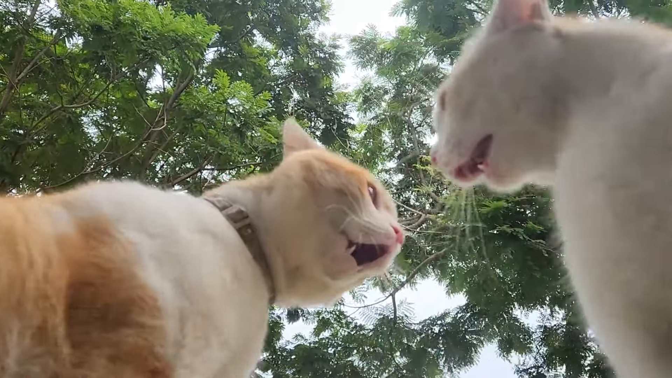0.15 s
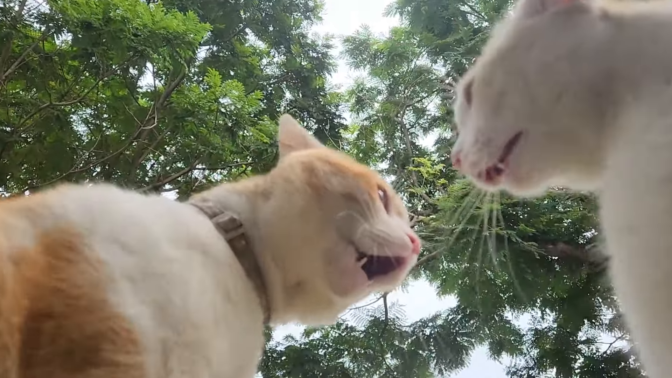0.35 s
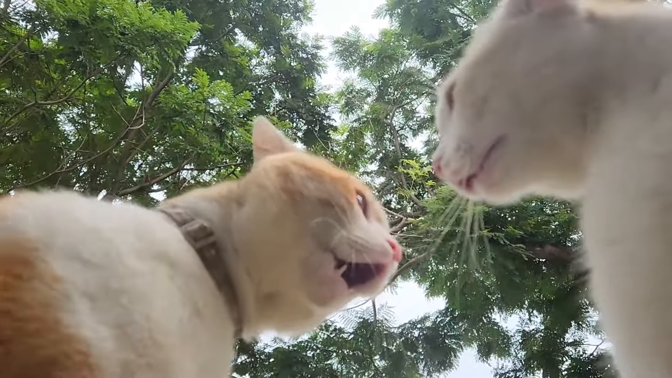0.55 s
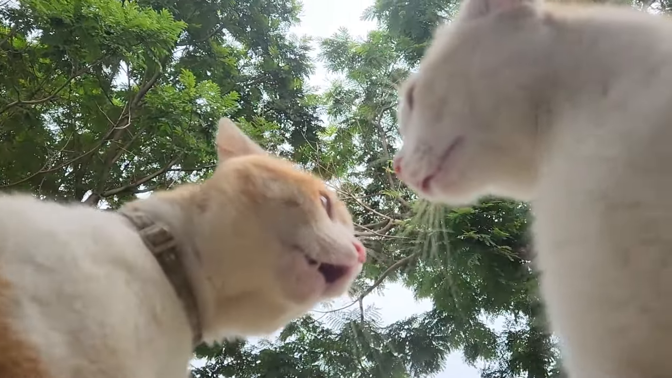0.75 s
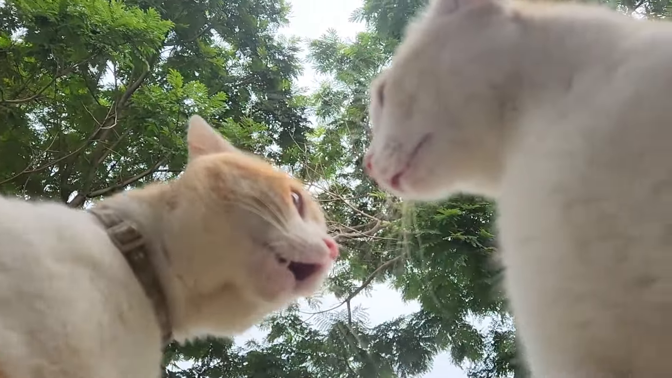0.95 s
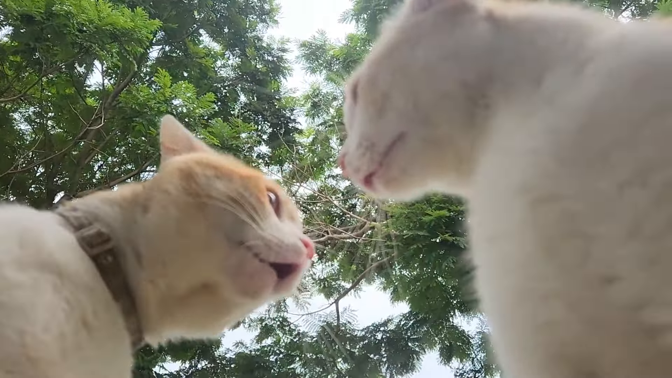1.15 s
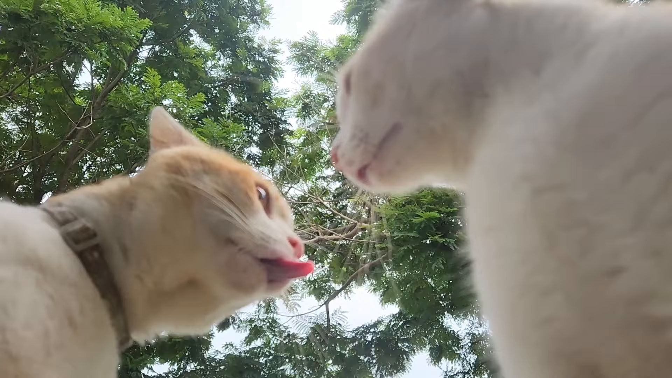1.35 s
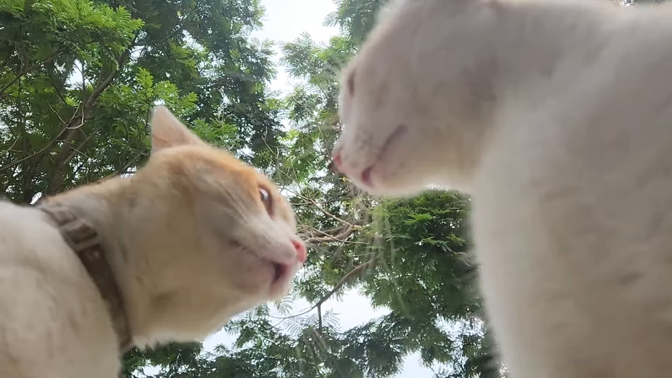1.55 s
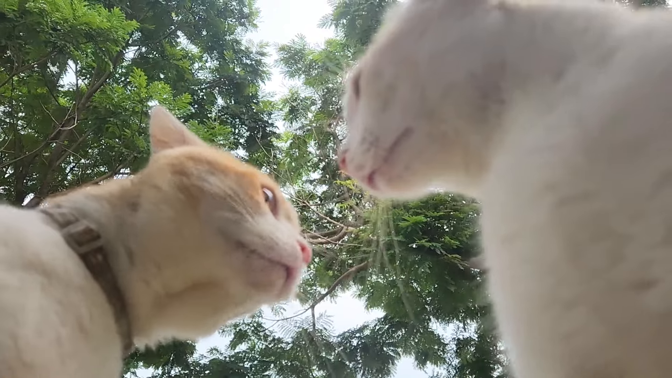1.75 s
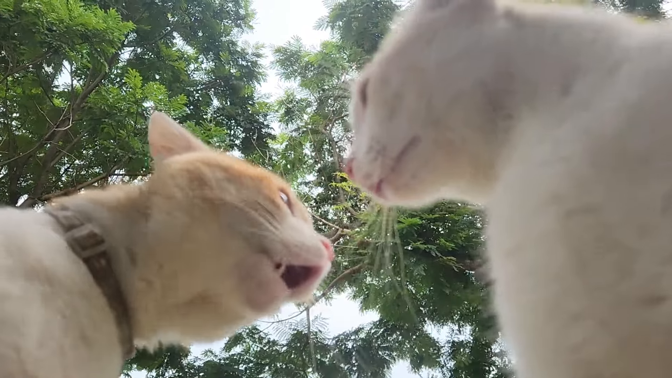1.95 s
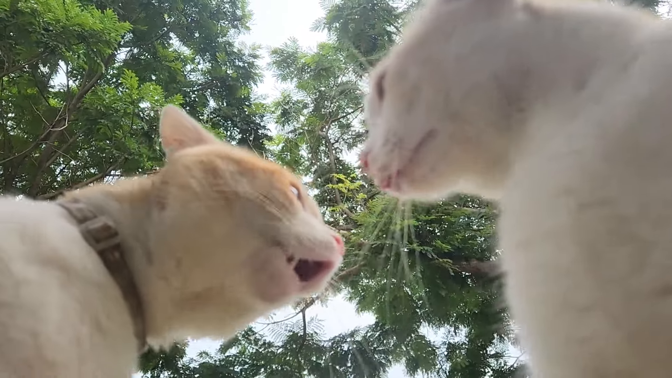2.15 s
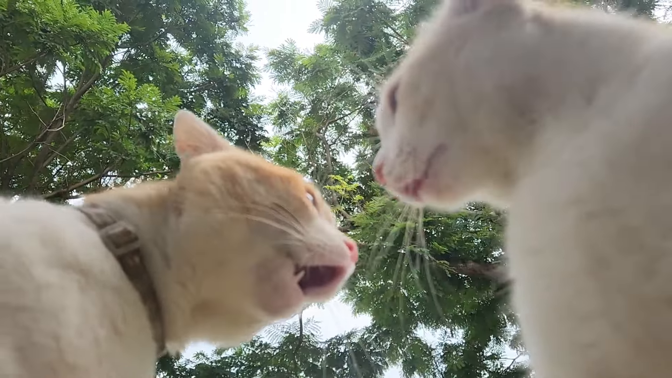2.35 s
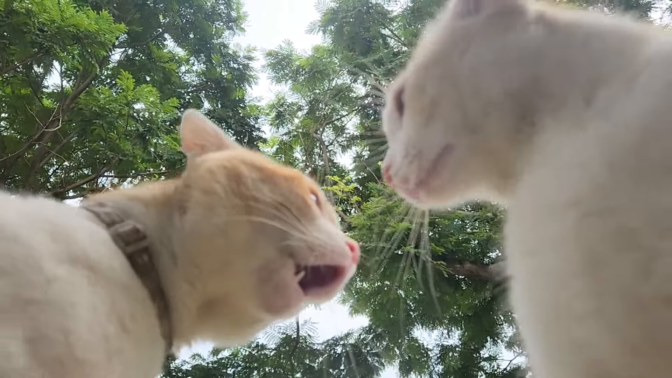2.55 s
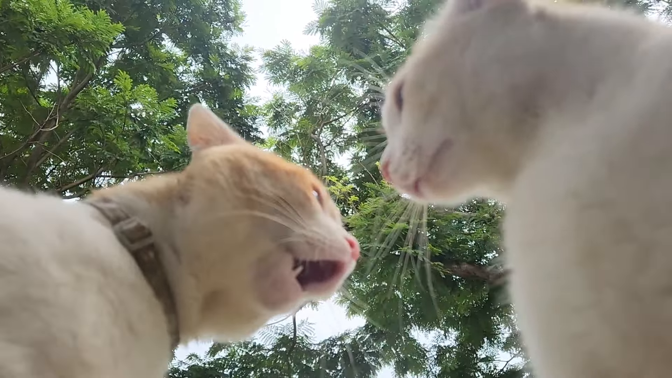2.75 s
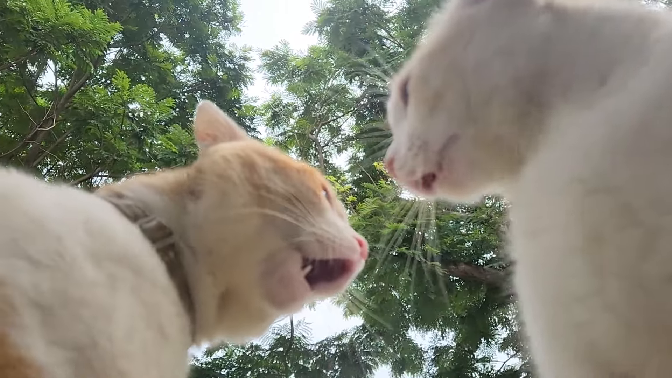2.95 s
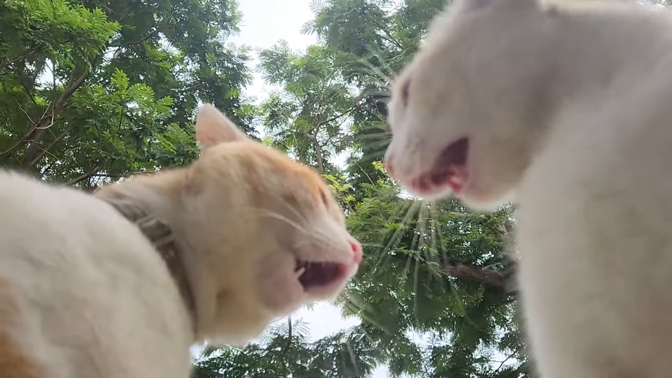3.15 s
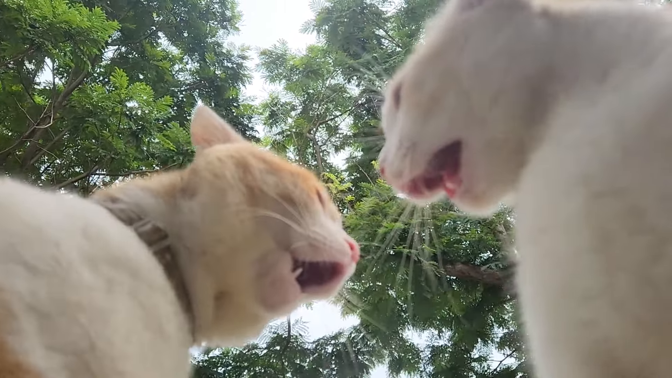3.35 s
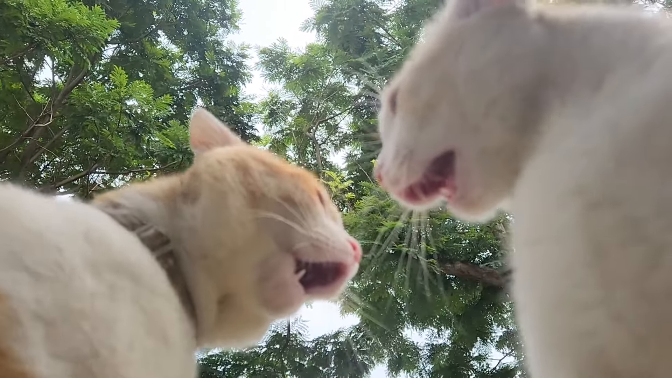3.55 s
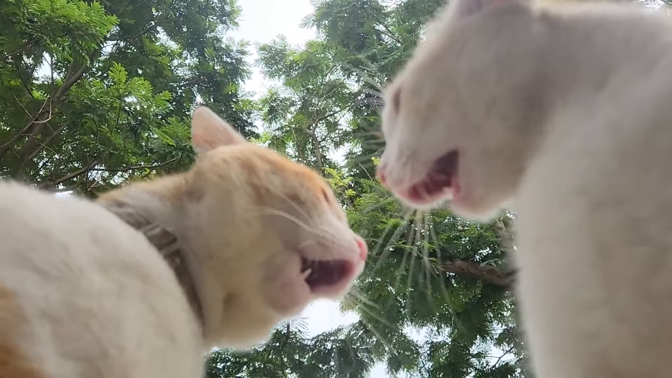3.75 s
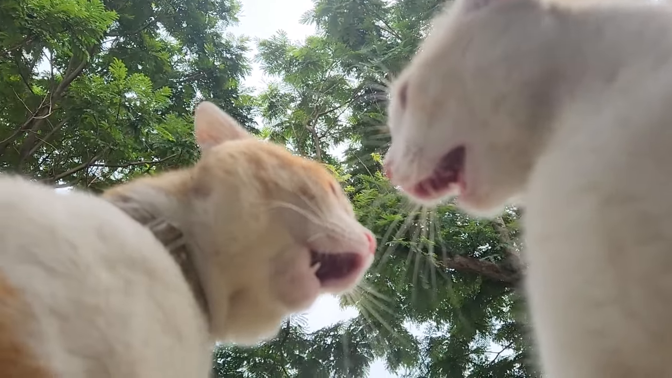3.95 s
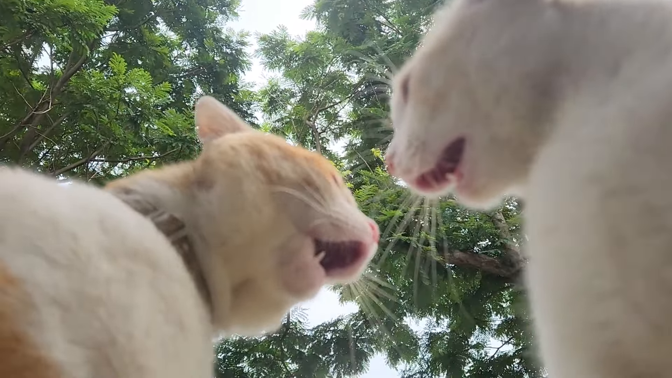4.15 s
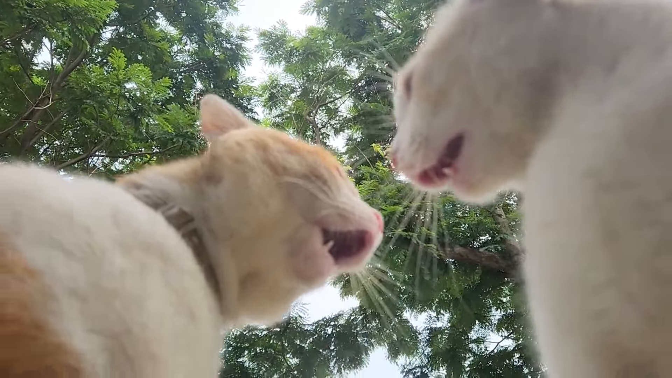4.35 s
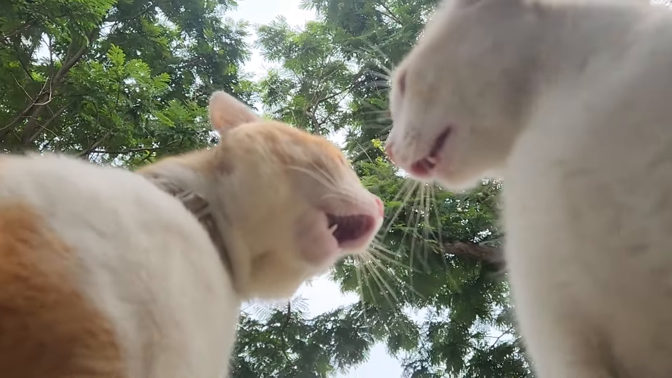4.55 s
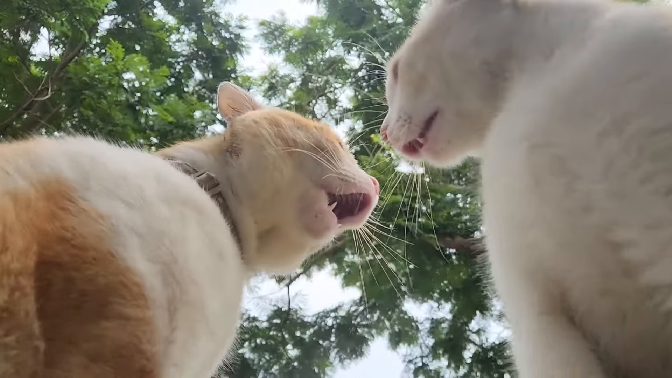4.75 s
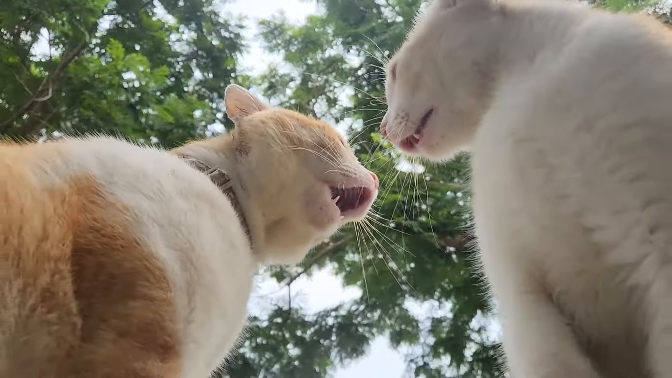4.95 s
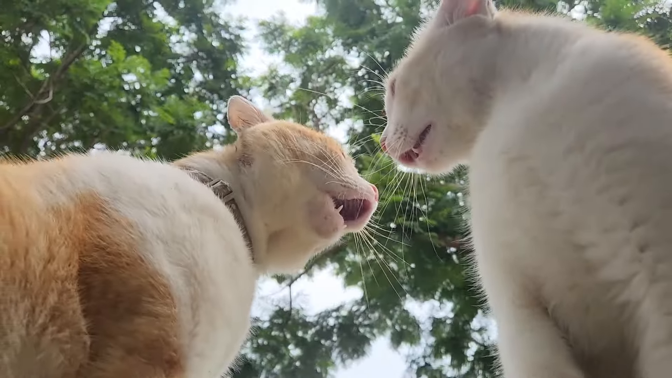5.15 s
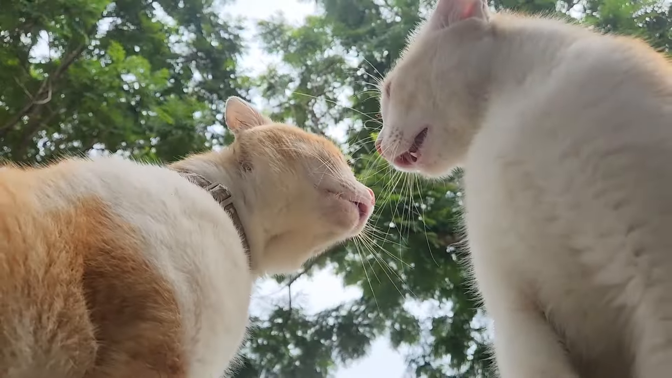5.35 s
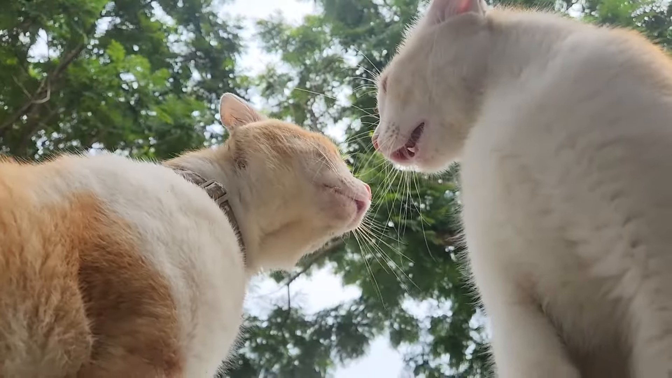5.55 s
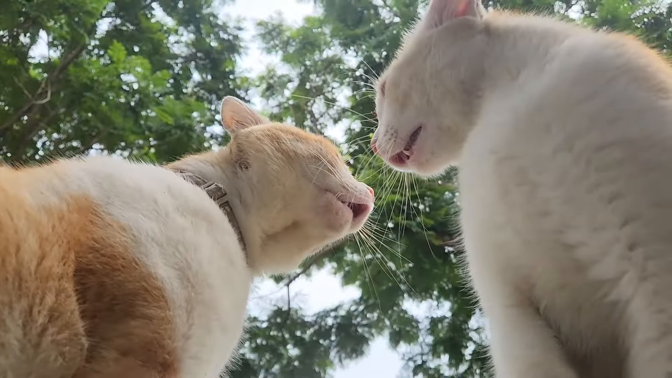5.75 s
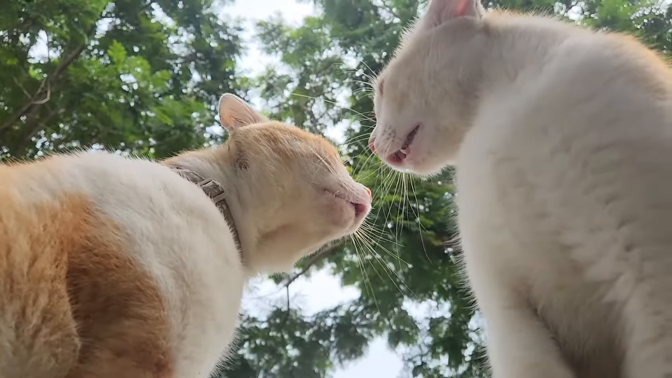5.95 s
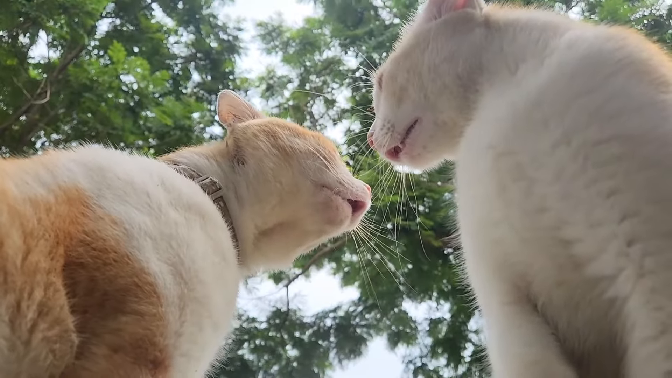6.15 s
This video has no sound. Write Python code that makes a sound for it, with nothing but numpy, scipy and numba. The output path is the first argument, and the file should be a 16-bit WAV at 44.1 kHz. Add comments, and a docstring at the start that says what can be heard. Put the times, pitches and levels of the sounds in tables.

```python
"""Two cats yowl nose to nose under trees, just above a phone near the ground.
Both call at once; the white cat sinks to a moan, with small clicks and faint falling chirps around it.
A breath hisses, the ginger cat rises into a long open yowl, and the rougher white cat joins and outlasts it.
Each voice is a train of glottal pulses, at times alternately strong and weak, ringing a moving mouth.
Shaped noise makes the breeze, hiss, town, clicks and chirps; wavering sines make a distant motor hum."""
import sys
import numpy as np
from scipy import signal
from scipy.fft import rfft, irfft, next_fast_len
from scipy.io import wavfile
from scipy.ndimage import uniform_filter1d, minimum_filter1d
from numba import njit

SR = 44100
rng = np.random.default_rng(int(sys.argv[2]) if len(sys.argv) > 2 else 0)


def put_to_file(sound):
    """Save the sound as 16-bit audio at rate SR, in the file named by the first command-line argument."""
    columns = np.atleast_2d(sound).T  # one column per channel
    safe = np.clip(columns, -1, 1)
    whole_steps = np.round(safe * 32767)
    wavfile.write(sys.argv[1], SR, whole_steps.astype(np.int16))


N = 272979
TIME = np.arange(N) / SR

# gusts of breeze on the microphone, before flutter and port balance: at_s, fall_to_1/e_s, peak_db
GUSTS = [(0.778, 0.17, -43), (1.674, 0.25, -35), (2.692, 0.44, -34), (3.789, 0.15, -35), (4.3, .25, -41.5),
         (4.65, 0.096, -33.5)]
CALM_DB = -46.5  # breeze between gusts, before the same
# soft hiss, the cats' breath over faint leaves, before flutter and stereo spread: at_s, level_db
BREATH_HISS = [(0, -46.5), (1.2, -59), (2.0, -57.5), (2.3, -49), (6.19, -55.5)]
# relative spectra of breeze, breath and leaf hiss, and far town: frequency_hz, level_db
BREEZE_COLOUR = [(15, -2.5), (30, -11), (48, 1), (100, -2.5), (140, -11.5), (300, -27.5), (800, -49),
                 (4000, -85.5)]
HISS_COLOUR = [(1000, 9.5), (3000, -5.5), (4500, 1), (6500, -5), (10000, -12.5), (15000, -37)]
TOWN_COLOUR = [(40, 11.5), (150, -5), (300, 6.5), (600, -10), (1200, -14), (2500, -27.5), (6000, -32),
               (15000, -29)]
# distant motor hum, middle of its wander: pitch_hz, level_db
HUM = [(98, -51.5), (146, -55), (195, -50)]
# faint chirps in the trees: start_s, length_s, level_db, start_hz, end_hz
CHIRPS = [(0.968, 0.083, -53.5, 5190, 4670), (1.597, 0.088, -57.5, 6300, 6000),
          (1.745, 0.12, -55, 5560, 4600), (2.124, 0.046, -60, 6200, 6000)]
# clicks of lips, tongue and collar, before panning: start_s, peak_db, centre_hz, width_hz (each pass), t60_s
CLICKS = [(1.268, -47, 8500, 2000, 0.011), (1.278, -51, 5400, 900, 0.0099),
          (1.469, -39.5, 2200, 1200, 0.027), (1.581, -38.5, 6955, 3993, .01),
          (1.858, -37, 9000, 8000, 0.008), (1.866, -39, 7980, 8000, .008), (1.878, -36, 5000, 5000, 0.011),
          (3.075, -26.5, 4600, 3900, .012), (4.667, -30, 8930, 9050, 0.014), (5.208, -38, 3184, 1496, .012),
          (5.461, -34, 3174, 1200, 0.013), (6.094, -28.5, 2550, 2500, 0.022)]

# pitch of each yowl, before waver, quaver and breaks: at_s, pitch_hz
GINGER_PITCH = [
    [(0, 324.6), (.1, 318.8), (.3, 301.6), (.51, 290.6), (.57, 271.5)],
    [(2.22, 129), (2.33, 278.4), (2.4, 338), (2.52, 393), (2.65, 423.8), (2.74, 450.3), (3.05, 444.6),
     (3.2, 428.7), (3.3, 404.2), (3.5, 386.2), (3.78, 372.9), (3.87, 381.4), (4.1, 383.2), (4.32, 360.7),
     (4.45, 367.9), (4.98, 367), (5.1, 353.8), (5.2, 319)],
]
WHITE_PITCH = [
    [(0, 408), (.12, 371), (.32, 312.9), (.57, 259.5), (.67, 246.7), (.79, 247.3), (.9, 236.2),
     (1.0, 215.4), (1.22, 197.8), (1.6, 174), (1.92, 137)],
    [(2.99, 150.4), (3.1, 238), (3.24, 405.2), (3.43, 415.3), (3.55, 387.4), (4.0, 374), (4.12, 358),
     (4.19, 339), (4.35, 333), (4.62, 293), (4.8, 265.5), (5.14, 255.2), (5.21, 291.8), (5.42, 318.4),
     (5.63, 307.3), (5.7, 293.4), (5.9, 265.5), (6.06, 269.8), (6.19, 255)],
]
# effort and mouth in each yowl, before flutter and panning: at_s, level_db, jaw_opening (0-1), top_resonance_hz
GINGER_MOUTH = [
    [(0, -23.5, 0.18, 5000), (.18, -20.5, 0.32, 5340), (.35, -24, 0.15, 5430), (.53, -22.5, 0.19, 5350),
     (.57, -34, 0.08, 5000)],
    [(2.22, -42, 0, 4900), (2.26, -27.5, 0.07, 5030), (2.31, -32, 0.21, 5500), (2.35, -18.5, 0.28, 5850),
     (2.43, -13, 0.6, 6500), (2.55, -10.5, .85, 7000), (2.72, -13, 0.94, 7400), (2.86, -13, 0.84, 7560),
     (2.95, -15.5, 0.65, 7450), (3.04, -11.5, 0.83, 7750), (3.18, -13.5, 0.98, 7950),
     (3.33, -16.5, 0.69, 8200), (3.7, -18, 0.59, 7560), (4.2, -17, 0.48, 6253), (4.5, -16, 0.54, 5797),
     (4.97, -16, .58, 5470), (5.2, -23, 0.46, 5743)],
]
WHITE_MOUTH = [
    [(0, -19, 1, 5830), (.11, -19, 0.84, 5300), (.17, -15.5, 0.68, 5250), (.25, -27.5, 0.53, 5250),
     (.33, -31.5, 0.27, 5000), (.75, -30.5, 0.047, 4350), (1.6, -30, 0.044, 4250), (1.85, -33, 0, 4400),
     (1.92, -45, 0, 4450)],
    [(2.99, -36.5, 0.36, 5900), (3.06, -23.5, 0.63, 6200), (3.17, -29.5, 0.83, 6500),
     (3.27, -25, 0.86, 6820), (3.4, -28.5, 0.95, 6800), (3.52, -22.5, 0.89, 6830),
     (3.75, -21.5, 0.93, 6970), (3.9, -19, 0.96, 6900), (4.1, -20, .7, 7040), (4.3, -25, 0.49, 6010),
     (4.55, -31, 0.12, 5170), (4.9, -28.5, 0.11, 4300), (5.1, -26.5, .21, 4396), (5.25, -26.5, 0.46, 4650),
     (5.46, -24, 0.57, 5250), (5.59, -24.5, .46, 4950), (5.76, -31, 0.19, 4400), (6.19, -29, .1, 4170)],
]
# what the opening jaw does: opening (0-1), first_resonance_hz, second_resonance_hz (tongue settled),
# rasp_db (before cracks and the cat's own rasp gain)
GINGER_JAW = [(0, 368, 1840, -22.5), (.5, 950, 2007, -35.5), (1.002, 1220, 1950, -33.5)]
WHITE_JAW = [(0, 403, 797, -39), (0.501, 878, 1098, -21.5), (1, 2095, 2070, -14)]
# tongue in each yowl: bend (share by which the second resonance starts off), settling_time_s
GINGER_TONGUE = [(0.02, 1), (-.21, 1.4)]
WHITE_TONGUE = [(0, 1), (.4, 0.93)]
# spells in which a voice cracks: start_s, end_s, period_doubling_db, extra_rasp_db
GINGER_CRACKS = [(0.355, .6, -18, -3), (2.215, 2.343, -15, -15), (3.267, 3.48, -28, 3.5),
                 (5.097, 5.22, -24, 6)]
WHITE_CRACKS = [(0, 0.246, -35, -0.5), (.28, 0.834, -6, -4), (2.98, 3.114, -9, -2.5),
                (3.154, 3.53, -10.5, 6.5), (4.345, 4.51, -3.5, 1), (5.15, 5.347, -11, 2),
                (5.64, 5.823, -6.5, 2)]
CLEAR_DOUBLING_DB, CRACK_FADE_S = -36, 0.076  # doubling left in a clear voice; time to slip in or out
# relative colour of the buzz that feeds the rasp: frequency_hz, level_db
GINGER_RASP = [(800, -27), (1500, -3), (2800, -33), (4000, -1.5), (6000, 0.5), (8000, 1.5), (9500, -2.5),
               (12000, 0.5), (14500, -5)]
WHITE_RASP = [(800, -19), (1500, 8.5), (2800, 4.5), (4000, -6), (6000, -6.5), (8000, -12.5), (9500, -4),
              (12000, -21.5), (14500, -13)]
# upper throat resonances, sliding together: multiple_of_top_resonance, width_hz (before widening), level_db
GINGER_UPPER = [(0.621, 636, -9.5), (1.0, 710, -2.5), (1.67, 900, -1), (1.969, 920, -2.5)]
WHITE_UPPER = [(0.529, 450, -12), (1.0, 416, 0.5), (1.42, 900, -24), (2.4, 1240, -4.5)]
GINGER_LEAK, WHITE_LEAK = .14, .27  # share of the buzz that passes between the upper resonances
# phase by which the left port leads: frequency_hz, lead_radians
GINGER_PHASE = [(0, 0), (700, .35), (1400, .95), (2100, 1.6), (4000, 1.7), (15000, 2.1)]
WHITE_PHASE = [(0, 0), (500, .4), (2300, .45), (5000, .7), (8000, 1.7), (15000, 2.1)]
# unsteadiness; jitter and shimmer grow with doubling: waver_share, jitter_cycles, shimmer_db, air_share
GINGER_UNREST = (.0035, .0005, .11, .008)
WHITE_UNREST = (.0035, .0009, .18, .02)
# the ginger cat's quaver at the height of its long yowl; the fade is to 1/e
QUAVER_AT_S, QUAVER_HZ, QUAVER_SHARE, QUAVER_FADE_S = 3.022, 7.6, 0.083, 0.1494
# breaks in the white cat's voice: at_s, pitch_leap_share
WHITE_BREAKS = [(4.37, .02), (5.655, .04)]
BREAK_S = 0.0213  # the leap peaks this long before a break and the drop as long after
# treble glancing off the cats' bodies and the ground: left_delay_ms, right_delay_ms, level_db
GLANCES = [(.55, 0.99, -32.5), (1.3, 1.2, -15.5), (1.9, 2.7, -9)]
CEILING, TOP_HZ = .8, 15300  # phone: peak limit before the treble cut; top of the treble


def undb(db):
    """Decibels to gain."""
    return 10 ** (np.asarray(db) / 20)


def curves(table, t):
    """The later columns of a table, joined by straight lines along its first."""
    s, *columns = np.transpose(table)
    return [np.interp(t, s, c) for c in columns]


def unit(x):
    """Scale to rms 1."""
    return x / np.sqrt(np.mean(x ** 2) + 1e-20)


def steady(x, size=700):
    """Scale to about rms 1 from moment to moment."""
    power = uniform_filter1d(uniform_filter1d(x ** 2, size), size)
    return x / np.sqrt(np.abs(power) + 1e-14)


def colour(x, points):
    """Filter by a spectrum of (frequency_hz, level_db), straight on a log frequency scale."""
    hz, db = np.transpose(points)
    n = x.shape[-1]
    size = next_fast_len(n + 2048)
    f = np.maximum(np.arange(size // 2 + 1) * SR / size, 1)
    gain = undb(np.interp(np.log(f), np.log(hz), db))
    return irfft(rfft(x, size) * gain, size)[..., :n]


def walk(rate, n):
    """Random levels held 1 / rate s and smoothed twice; spread about 1."""
    k = max(int(SR / rate), 1)
    steps = np.repeat(rng.standard_normal(n // k + 1), k)
    return unit(uniform_filter1d(uniform_filter1d(steps, k), k))[:n]


@njit
def resonate(x, hz, width):
    """Moving state-variable resonance: its low-pass and band-pass outputs."""
    low, band, b, l = np.empty(len(x)), np.empty(len(x)), 0., 0.
    for i in range(len(x)):
        g, k = np.tan(np.pi * min(hz[i], .45 * SR) / SR), width[i] / hz[i]
        v = (b + g * (x[i] + 1e-18 - l)) / (1 + g * (g + k))
        low[i], band[i] = l + g * v, k * v
        b, l = 2 * v - b, 2 * low[i] - l
    return low, band


def steep_band(x, hz, width_hz):
    """A resonance applied twice; its centre may move."""
    width = np.full(len(hz), float(width_hz))
    once = resonate(x, hz, width)[1]
    return resonate(once, hz, width)[1]


def noise_band(hz, width_hz):
    """Noise in a steep band."""
    return steep_band(rng.standard_normal(len(hz)), hz, width_hz)


def add(out, x, s):
    """Mix x into out, starting at s seconds."""
    i = max(int(s * SR), 0)
    out[..., i:i + x.shape[-1]] += x[..., :max(N - i, 0)]


def place(x, phase, pan_db):
    """The left port hears the sound a little earlier and louder."""
    n = len(x)
    size = next_fast_len(n + 256)
    f = np.arange(size // 2 + 1) * SR / size
    side = np.array([[1], [-1]]) / 2
    shift = np.exp(1j * side * np.interp(f, *np.transpose(phase)))
    return irfft(rfft(x, size) * shift, size)[:, :n] * undb(side * pan_db)


def stereo_noise(points, side):
    """Coloured noise, partly different at the two ports."""
    mid, diff = colour(rng.standard_normal((2, N)), points)
    return unit(mid) + side * unit(diff) * np.array([[1], [-1]])


def motor_hum():
    """Distant steady tones, each wavering in level and pitch."""
    hum = np.zeros(N)
    for hz, db in HUM:
        level = np.sqrt(2) * undb(db + 3.4 * walk(6, N))
        turns = np.cumsum(hz * (1 + .008 * walk(7, N))) / SR
        hum += level * np.sin(2 * np.pi * turns)
    return hum


def outdoors():
    """A gusty breeze on the microphone, breath and leaf hiss, and a far town with a wavering hum."""
    gusts = sum(undb(db) * np.exp(-((TIME - s) / fall_s) ** 2) for s, fall_s, db in GUSTS)
    wind = (undb(CALM_DB) + gusts) * undb(2 * walk(18, N))
    breeze = stereo_noise(BREEZE_COLOUR, side=0.23) * wind * undb([[1.5], [-4.5]])  # stronger at the left
    hiss_db, = curves(BREATH_HISS, TIME)
    hiss = stereo_noise(HISS_COLOUR, side=1.0) * undb(hiss_db + walk(24, N))
    town = stereo_noise(TOWN_COLOUR, side=0.32) * undb(-46.0 + 1.8 * walk(3.08, N))
    return breeze + hiss + town + motor_hum()


def birds():
    """Short falling chirps of narrow noise, smeared by the foliage so that the ports differ."""
    out = np.zeros((2, N))
    for s, length, db, start_hz, end_hz in CHIRPS:
        hz = np.linspace(float(start_hz), end_hz, int(length * SR))
        chirp = np.array([noise_band(hz, 860) for _ in range(2)]) * np.hanning(len(hz))
        add(out, undb(db) * unit(chirp), s)
    return out


def clicks():
    """Tiny noise bursts from lips, tongue and collar that die within milliseconds."""
    out, t = np.zeros(N), TIME[:2048]
    for s, db, hz, width_hz, t60 in CLICKS:
        burst = noise_band(np.full(len(t), float(hz)), width_hz) * np.exp(-np.log(1000) * t / t60)
        add(out, undb(db) * burst / np.abs(burst).max(), s)
    return place(out, WHITE_PHASE, pan_db=8)


def reflections(x, t60, db):
    """Trees and walls return a faint dull tail."""
    t = TIME[:SR // 2]
    noise = colour(rng.standard_normal((2, len(t))), [(1500, 25), (8000, -8.5)])
    tail = noise * np.exp(-np.log(1000) * t / t60) * (t > .008)
    return signal.fftconvolve(x, undb(db) * unit(tail) / np.sqrt(len(t)), axes=1)[:, :N]


def glance(x):
    """Add the short bounces off bodies and ground, a different set at each port."""
    i = np.arange(x.shape[1])
    out = x.copy()
    for *delays_ms, db in GLANCES:
        for port, ms in enumerate(delays_ms):
            out[port] += undb(db) * x[port, np.maximum(i - int(ms * SR / 1000), 0)]
    return out


def quaver(t):
    """Pitch factor of a tremble that swells and dies away."""
    since = t - QUAVER_AT_S
    swell = np.exp(-np.abs(since) / QUAVER_FADE_S)
    return 1 + QUAVER_SHARE * swell * np.cos(2 * np.pi * QUAVER_HZ * since)


def breaks(t):
    """Pitch factor of the brief leap and drop at each break of the voice."""
    factor = np.ones(len(t))
    for s, share in WHITE_BREAKS:
        since = (t - s) / BREAK_S
        factor -= share * since * np.exp(.5 - .5 * since ** 2)
    return factor


def cracking(cracks, t):
    """Period doubling and extra rasp, in dB, as a voice slips in and out of its cracks."""
    doubling_db, rasp_db = np.full(len(t), float(CLEAR_DOUBLING_DB)), np.zeros(len(t))
    for start, end, split_db, extra_db in cracks:
        spell = np.clip(.5 + np.minimum(t - start, end - t) / CRACK_FADE_S, 0, 1)
        doubling_db += spell * (split_db - CLEAR_DOUBLING_DB)
        rasp_db += spell * extra_db
    return doubling_db, rasp_db


def articulate(mouth, jaw, tongue, cracks, t):
    """The jaw sets both resonances and the rasp; the tongue bends the second until it settles."""
    db, opening, top_hz = curves(mouth, t)
    first_hz, second_hz, rasp_db = curves(jaw, opening)
    bend, settle_s = tongue
    second_hz = second_hz * (1 + bend * np.clip(1 - (t - t[0]) / settle_s, 0, 1))
    first_hz, second_hz = np.clip(first_hz, SR / 200, SR / 8), np.clip(second_hz, SR / 100, SR / 8)
    doubling_db, extra_db = cracking(cracks, t)
    return db, first_hz, second_hz, top_hz, rasp_db + extra_db, doubling_db


def glottis(turns, doubling, jitter, shimmer_db, size=8):
    """One pulse per cycle; when the period doubles they alternate strong and weak and grow uneven."""
    n, k = len(turns), np.arange(1, int(turns[-1]))
    chance = rng.standard_normal((len(k), 2))
    split = np.interp(k, turns, doubling)
    unrest = 1 + 3 * split
    at = np.interp(k + jitter * unrest * chance[:, 0], turns, np.arange(n))
    strength = (1 + split * (-1) ** k) * undb(shimmer_db * unrest * chance[:, 1])
    # windowed sincs set the pulses between samples
    taps = at.astype(int)[:, None] + np.arange(1 - size, size + 1)
    offset = taps - at[:, None]
    shape = np.sinc(offset) * np.cos(np.pi * offset / (2 * size)) ** 2
    pulses = np.bincount(np.clip(taps, 0, n - 1).ravel(), (strength[:, None] * shape).ravel(), n)
    return pulses - np.gradient(turns)  # the steady flow is silent


def yowl(pitch, mouth, jaw, tongue, cracks, rasp_colour, upper, phase, unrest, wobble, q1, q2, low_cut,
         nose_hz, nose_db, leak, rasp_gain_db, hiss, flutter_db, pan_db, rasp_pan_db):
    """One call: pulses and puffs of air ring the mouth and the nose, with a thin rasp above them."""
    waver, jitter, shimmer_db, air = unrest
    start, end = max(pitch[0][0], 0), pitch[-1][0]
    t = np.arange(start, end, 1 / SR)
    n = len(t)
    hz = curves(pitch, t)[0] * wobble(t)
    db, first_hz, second_hz, top_hz, rasp_db, doubling_db = articulate(mouth, jaw, tongue, cracks, t)

    turns = np.cumsum(hz * (1 + waver * walk(45, n))) / SR
    pulses = steady(glottis(turns, undb(np.minimum(doubling_db, 0)), jitter, shimmer_db))
    puffs = unit(rng.standard_normal(n) * (1 + np.cos(2 * np.pi * turns)))  # air escapes once a cycle
    flow = colour(pulses + air * puffs, [(50, -40), (130, 8.5), (300, -3.0), (1200, -7.5),
                                         (1900, -11), (2600, -12.5), (9600, -23)])
    cut_hz = low_cut * hz
    flow = flow - sum(resonate(flow, cut_hz, 0.92 * cut_hz))  # high-pass that follows the pitch

    throat = resonate(flow, first_hz, first_hz / q1)[0]
    vowel = resonate(throat, second_hz, second_hz / q2)[0]
    vowel = vowel - 2 * resonate(vowel, first_hz, first_hz / 2)[1]  # delays each pulse around the resonance
    nose = steep_band(flow, np.full(n, float(nose_hz)), 450)
    voice = steady(vowel) + undb(nose_db) * steady(nose)

    buzz = colour(pulses + hiss * puffs, rasp_colour)
    rasp = leak * buzz
    for ratio, width, level_db in upper:
        rasp = rasp + undb(level_db) * steep_band(buzz, ratio * top_hz, 2.18 * width)

    fade = np.clip(np.minimum((t - start) / .004, (end - t) / .012), 0, 1)
    gain = undb(db + flutter_db * walk(22, n)) * fade
    rasp = steady(rasp) * gain * undb(rasp_db + rasp_gain_db)
    out = np.zeros((2, N))
    add(out, place(voice * gain, phase, pan_db), start)
    add(out, glance(place(rasp, phase, rasp_pan_db)), start)
    return out


def white_cat():
    """The rougher voice: it flares open, then sinks to a moan through a nearly shut mouth."""
    return sum(yowl(pitch, mouth, WHITE_JAW, tongue, WHITE_CRACKS, WHITE_RASP, WHITE_UPPER, WHITE_PHASE,
                    WHITE_UNREST, wobble=breaks, q1=3.22, q2=4.9, low_cut=0.88, nose_hz=1282, nose_db=-26,
                    leak=WHITE_LEAK, rasp_gain_db=2.5, hiss=0.34, flutter_db=1.66, pan_db=3.0,
                    rasp_pan_db=4.5)
               for pitch, mouth, tongue in zip(WHITE_PITCH, WHITE_MOUTH, WHITE_TONGUE))


def ginger_cat():
    """The louder, clearer voice; its long yowl is held with a wide open mouth."""
    return sum(yowl(pitch, mouth, GINGER_JAW, tongue, GINGER_CRACKS, GINGER_RASP, GINGER_UPPER, GINGER_PHASE,
                    GINGER_UNREST, wobble=quaver, q1=3.92, q2=6.9, low_cut=1.45, nose_hz=1560, nose_db=-50,
                    leak=GINGER_LEAK, rasp_gain_db=4.0, hiss=0.35, flutter_db=1.6, pan_db=3.0,
                    rasp_pan_db=2.5)
               for pitch, mouth, tongue in zip(GINGER_PITCH, GINGER_MOUTH, GINGER_TONGUE))


def scene():
    """Both cats at close range, in the open air."""
    close = ginger_cat() + white_cat() + clicks()
    tail = reflections(close, t60=.25, db=-36)
    return outdoors() + birds() + tail + close


def record(dry, size=441):
    """The phone eases its gain on the loudest peaks and cuts the top of the treble."""
    headroom = CEILING / np.maximum(np.abs(dry).max(axis=0), CEILING)
    gain = uniform_filter1d(minimum_filter1d(headroom, 2 * size), size)
    treble_cut = signal.ellip(10, .2, 80, TOP_HZ, fs=SR, output="sos")
    return signal.sosfilt(treble_cut, dry * gain)


dry = scene()
out = record(dry)
put_to_file(out)
```